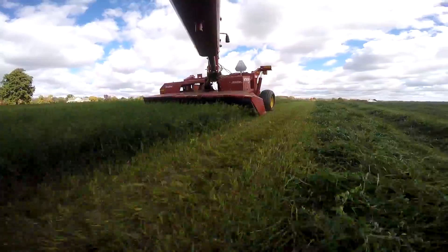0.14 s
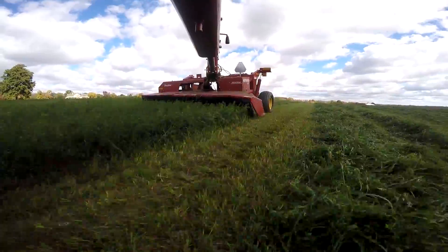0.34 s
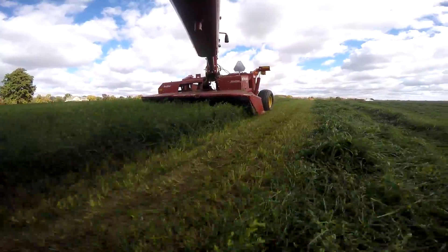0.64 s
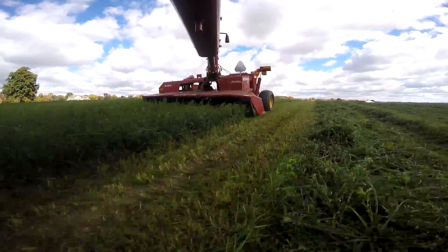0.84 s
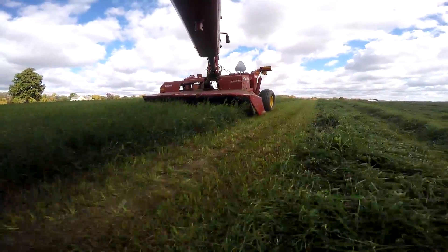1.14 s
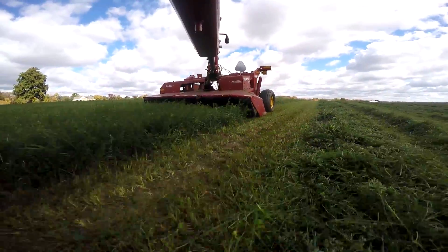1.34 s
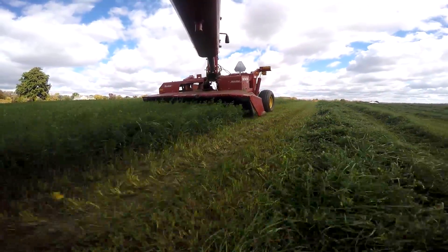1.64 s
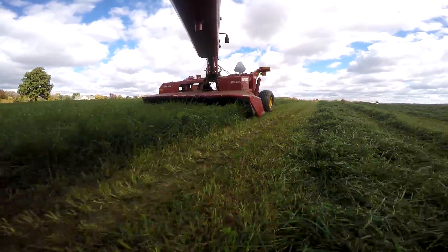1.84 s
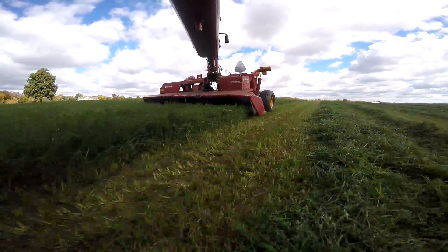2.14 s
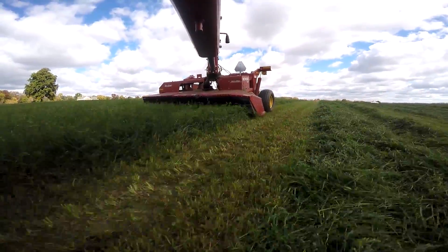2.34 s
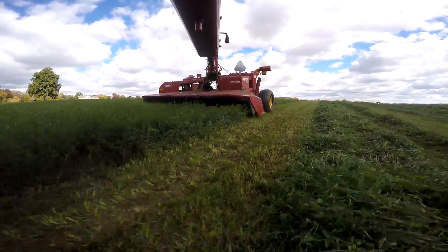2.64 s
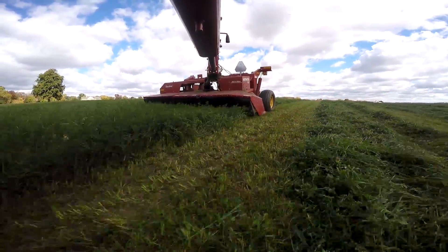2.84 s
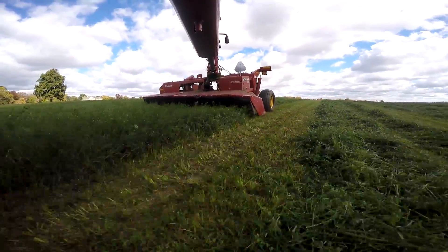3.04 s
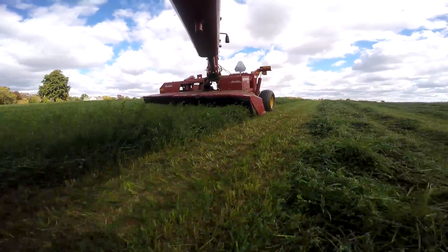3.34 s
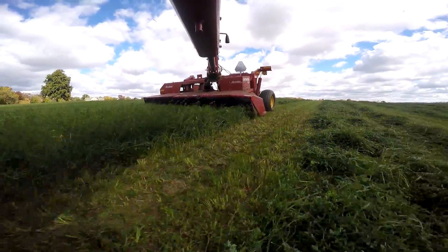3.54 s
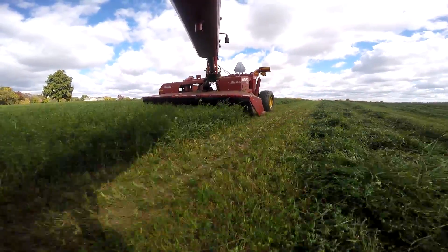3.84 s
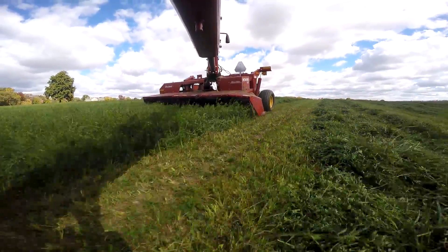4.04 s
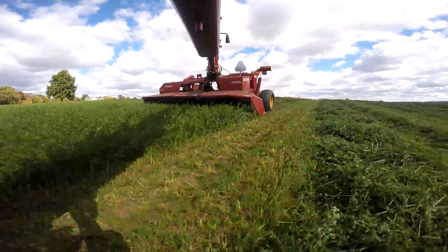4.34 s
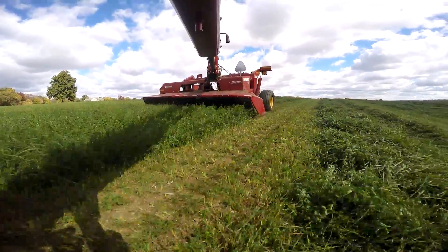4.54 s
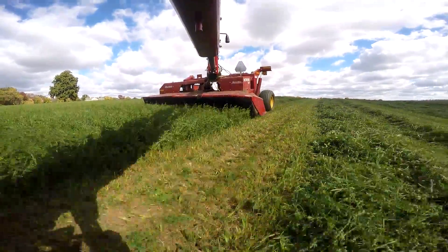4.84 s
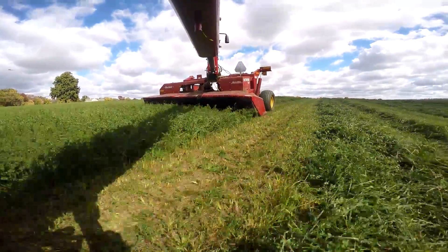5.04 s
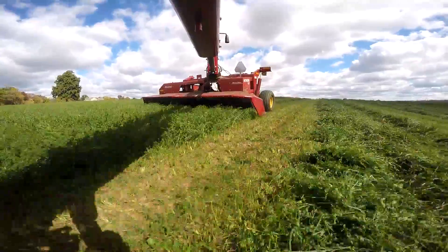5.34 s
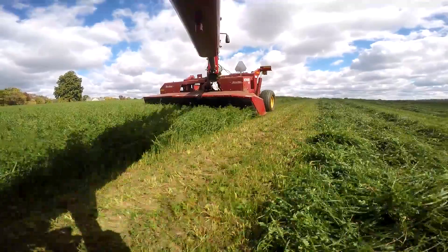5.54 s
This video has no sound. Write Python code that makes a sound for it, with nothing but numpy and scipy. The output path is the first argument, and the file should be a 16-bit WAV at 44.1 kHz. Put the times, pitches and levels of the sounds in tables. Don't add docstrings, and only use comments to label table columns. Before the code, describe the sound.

Continuous mowing machinery in an open field, picked up right on the metal frame. Irregular low thumps shudder underneath; a steady geared hum rises slightly after 1.6 seconds, sags near 4.8, then recovers. Over it, coarse gearbox rattle, ringing bar clatter and thin, fainter treble jingle swell and bunch, with scattered hard clanks throughout.

```python
import sys
import numpy as np
from scipy import signal
from scipy.fft import rfft, irfft, next_fast_len
from scipy.io import wavfile
from scipy.ndimage import uniform_filter1d, minimum_filter1d, map_coordinates

SR = 44100
rng = np.random.default_rng(int(sys.argv[2]) if len(sys.argv) > 2 else 0)


def field_ratio(decibels):
    return 10 ** (np.asarray(decibels, dtype=float) / 20)


def digitize_waveform(pressure):
    field = np.atleast_2d(pressure).T
    bounded = np.clip(field, -1, 1)
    quanta = np.round(bounded * 32767).astype(np.int16)
    wavfile.write(sys.argv[1], SR, quanta)


N = 250929
TEETH = 21


def curves(rows):
    s, *cols = np.transpose(rows)
    return [np.interp(np.arange(N) / SR, s, c) for c in cols]


def unit(x):
    return x / np.sqrt(np.mean(x ** 2) + 1e-20)


def wobble(rate):
    return map_coordinates(rng.standard_normal(int(N * rate / SR) + 4), [np.arange(N) * rate / SR])


def humps(s, half, db):
    t = np.arange(0, N + 64, 64) / SR
    bells = np.exp(-((t - s[:, None]) / half[:, None]) ** 2)
    return np.interp(np.arange(N) / SR, t, db @ bells)


def spells(rows, edge, rest_db):
    s, length, db = np.transpose(rows)
    t = np.arange(N) / SR
    since_start = t - s[:, None]
    until_end = s[:, None] + length[:, None] - t
    on = np.clip(np.minimum(since_start, until_end) / edge + .25, 0, 1)
    return rest_db + (db - rest_db) @ on


def ring(x, power):
    size = next_fast_len(N + SR // 2)
    gain = power(np.fft.rfftfreq(size, 1 / SR)) + 1e-14
    cepstrum = irfft(np.log(gain / gain.mean()) / 2, size)
    cepstrum[1:size // 2] *= 2
    cepstrum[size // 2 + 1:] = 0
    return irfft(rfft(x, size) * np.exp(rfft(cepstrum)), size)[..., :N]


def modes(table, steep):
    def power(f):
        total = 0
        for center, width, db in table:
            damping = (f * width) ** 2
            resonance = damping / ((center * center - f * f) ** 2 + damping)
            total = total + field_ratio(2 * db) * resonance ** steep
        return total
    return power


def spectrum(points):
    hz, db = np.transpose(points)
    return lambda f: field_ratio(2 * np.interp(np.log(f + 1), np.log(hz), db, left=-80, right=-80))


def shaft_turns():
    # (time [s], frequency [Hz])
    mesh_rate = [(0.0, 362.3), (0.7, 362.9), (1.55, 363.2), (1.8, 365.5), (2.2, 367.0), (2.8, 366.6),
                 (3.4, 364.9), (3.6, 365.2), (3.9, 366.7), (4.4, 366.4), (4.8, 362.2), (5.0, 362.6),
                 (5.4, 365.9), (5.7, 366.8)]
    return np.cumsum(curves(mesh_rate)[0]) / SR / TEETH


def chatter(shared, clump_db, swell_db, spiky_db):
    turns = shaft_turns()
    struck = rng.random(N) < 900 / SR
    sizes = field_ratio(spiky_db * np.minimum(rng.exponential(size=N), 3))
    taps = struck * sizes * rng.standard_normal(N)
    gate = 1 + 0.21 * np.cos(2 * np.pi * TEETH * turns)
    swell = swell_db * np.cos(2 * np.pi * (turns - .33))
    effort_db = clump_db * (shared + 0.46 * wobble(30)) + swell
    return unit(field_ratio(effort_db) * gate * (rng.standard_normal(N) + 0.58 * unit(taps)))


def knocks():
    # (time [s], peak level [dB], guard level and gearbox level relative to it [dB])
    hard_knocks = [(0.0559, -10.5, -31, -13.5), (0.8814, -4, -38, -10), (0.9366, -4, -40, -13),
                   (0.9848, -3.5, -29, 0.5), (1.4602, -5, -31.5, -6), (1.7484, -4.5, -38, -8),
                   (2.0457, -6.5, -25, -5.5), (2.091, -1.5, -36, -12), (2.4342, -11, -26.5, -14),
                   (2.4945, -1, -42.5, -12.5), (2.797, -1.5, -49, -15.5), (2.8414, -6.5, -28.5, -14),
                   (2.9108, -1, -29, -3.5), (3.0682, -14.5, -29, -12.5), (3.248, -7.5, -36, -8.5),
                   (3.4088, -0.5, -32, -13), (3.454, -7.5, -21, -12.5), (3.5964, -6, -25, -6),
                   (3.9246, -9.5, -39.5, -13.5), (3.9912, -3.5, -28, -9.5), (4.0779, -3, -31, -1.5),
                   (4.334, -3, -26, -6.5), (4.3735, -7.5, -30, -17), (4.5082, -10, -29, -10.5),
                   (4.667, -10.5, -32.5, -13), (4.7548, -3.5, -33.5, -0.5), (4.8996, -9.5, -30.5, -3.5),
                   (5.072, -13.5, -36, -15), (5.1421, 0, -30, -13), (5.4883, -4, -27, -8.5)]
    out = np.zeros((3, N + SR))
    t = np.arange(SR // 25) / SR
    envelope = field_ratio(-60 * t / 0.027) * (1 - np.exp(-t / 0.00083))
    for s, db, guard_db, box_db in hard_knocks:
        burst = envelope * rng.standard_normal((3, len(t)))
        burst[:, 8] += 3.5
        level = field_ratio(db + np.array([[-7.2], [guard_db - 8.5], [box_db - 4]]))
        start = round(s * SR)
        out[:, start:start + len(t)] += level * burst
    return out[:, :N]


def rattle():
    # (time [s], level [dB])
    crop_load = [(0.0, -1.5), (0.17, 1.06), (0.8, -0.5), (1.2, .5), (1.8, -.5), (2.3, -0.3), (2.6, -1.5),
                 (3.05, -1), (3.3, -0.5), (3.77, 2), (4.1, -1), (4.5, 1), (4.7, -2), (4.95, 2.3), (5.25, 0),
                 (5.69, -0.1)]
    # (time [s], half length [s], level [dB], extra level in the lighter steel [dB])
    surges = [(0.19, 0.027, 1, -0.5), (0.342, 0.018, 2, -2), (0.447, .03, -8.5, 3.5),
              (0.483, .015, 7, -3.5), (0.521, 0.024, -2.5, -2.5), (0.582, .025, 5, -0.8),
              (0.622, 0.024, -2.5, 0.5), (0.649, .015, 1.5, -.7), (0.787, 0.017, -1.5, -2),
              (0.866, .02, -5, 2.5), (1.158, 0.03, -4, -1.3), (1.571, 0.025, 2, -0.2),
              (1.843, 0.013, -3.5, .7), (2.514, .012, 1.5, 0), (2.542, .02, -0.5, -1.5),
              (2.636, .015, -1.5, 0), (3.056, 0.011, -3, -4), (3.099, 0.017, -0.5, -1),
              (3.133, 0.014, 2, 1.5), (3.221, 0.036, 3.5, 0), (4.045, 0.023, -2.5, -0.3),
              (4.063, .015, 6.5, -1), (4.26, .02, 2, -1.5), (4.637, .02, -3.5, 0), (4.944, 0.011, -0.5, -3),
              (5.058, 0.045, -2, -0.8), (5.147, 0.012, -0.5, 0), (5.179, .012, -4, 1),
              (5.202, 0.014, 3.5, 1), (5.343, .02, 2.5, 2)]
    # (start [s], length [s], level [dB])
    bolt_spells = [(0.173, 0.048, -63.5), (0.324, 0.042, -61), (0.448, 0.062, -59.5), (0.662, 0.13, -60),
                   (0.919, 0.046, -65), (1.258, 0.068, -60), (1.454, 0.062, -60), (1.67, 0.124, -58.5),
                   (2.034, 0.046, -63), (2.12, 0.082, -61), (2.628, 0.042, -61), (2.823, 0.058, -62),
                   (2.932, 0.036, -63), (3.014, 0.044, -61.5), (3.199, 0.18, -59.5), (3.431, 0.094, -59),
                   (3.64, 0.096, -56), (3.755, 0.068, -58), (3.906, 0.11, -60), (4.035, 0.072, -59),
                   (4.246, 0.048, -60), (4.307, 0.168, -60.5), (4.51, 0.058, -58), (4.612, 0.046, -63),
                   (4.8, 0.114, -61), (4.947, 0.112, -61), (5.101, 0.32, -60.5), (5.447, 0.042, -59),
                   (5.508, 0.048, -60), (5.656, 0.03, -57)]
    # (frequency [Hz], power density [dB per Hz])
    gearbox_colour = [(110, -26), (140, -16.5), (190, -19.5), (255, -1.5), (305, -13.5), (350, -8),
                      (385, 3), (430, -2.5), (520, -11), (740, -3.5), (835, -19.5), (1000, -9.5),
                      (1100, -6), (1350, -16), (1700, -25)]
    # (frequency [Hz], width [Hz], level [dB])
    bar_modes = [
        (1484, 120, -10.5),
        (1881, 144, -3),
        (2288, 141, 0),
        (2420, 330, -17.5),
        (2788, 28, -5),
        (3191, 130, -8.5),
        (3340, 98, -10),
        (3806, 250, -20.5),
    ]
    # (frequency [Hz], width [Hz], level [dB])
    guard_modes = [(3860, 230, -3), (4840, 300, -18.5), (5040, 200, -7), (5440, 610, -6), (5950, 100, 3),
                   (6130, 140, -10), (6340, 460, -14), (6735, 130, -8.5), (7100, 300, -17.5),
                   (7560, 250, -14.5), (7640, 99, -8), (8430, 90, -20.5)]

    shared = 0.52 * wobble(13) + 0.51 * wobble(45)
    s, half, db, extra_db = np.transpose(surges)
    load_db = curves(crop_load)[0] + humps(s, half, db)
    light_db = humps(s, half, extra_db)
    box_db = -20.5 + load_db
    bar_db = -22.5 + 0.57 * load_db + light_db
    guard_db = -43.5 + np.maximum(load_db + light_db, -1.5)
    bolt_db = spells(bolt_spells, edge=.012, rest_db=-74)

    bar_hit, guard_hit, box_hit = knocks()
    box = field_ratio(box_db + 2.01) * chatter(shared, clump_db=1.45, swell_db=1.2, spiky_db=5) + box_hit
    bar = field_ratio(bar_db + 1.67) * chatter(shared, clump_db=1.0, swell_db=1.17, spiky_db=6.5) + bar_hit
    guards = field_ratio(guard_db + 0.8) * chatter(shared, clump_db=2.0, swell_db=1.34, spiky_db=4.5) + guard_hit
    bolts = field_ratio(bolt_db) * chatter(shared, clump_db=-0.2, swell_db=0.6, spiky_db=3.0)

    heavy = lambda f: modes(bar_modes, steep=1.2)(f) / (1 + (f / 3600) ** 8)
    thin = lambda f: modes(guard_modes, steep=1.3)(f) / (1 + (3500 / (f + 1)) ** 8)
    bolt_mode = modes([(9726, 120, 0.0036)], steep=2.3)
    low = ring(box, spectrum(gearbox_colour)) + ring(bar, heavy)
    return low + ring(guards, thin) + ring(bolts, bolt_mode)


def whine():
    # (time [s], mesh tone level [dB], edge contact level [dB])
    tooth_load = [(0.0, -27.5, -40), (0.2, -16.5, -33.5), (0.55, -16, -30), (0.87, -26.5, -39),
                  (1.14, -21, -33), (1.57, -19, -31.5), (1.88, -18, -32), (2.04, -21, -28.5),
                  (2.64, -17.5, -30), (3.22, -17.5, -30), (3.41, -21.5, -42), (3.88, -18.5, -35.5),
                  (4.14, -21.5, -39), (4.52, -16.5, -45), (4.85, -14.5, -34), (5.18, -19.5, -39),
                  (5.4, -18, -38), (5.69, -20.5, -29.5)]
    # (multiple of the mesh rate [1], level relative to it [dB])
    overtones = [
        (2, -11.5),
        (3, -19),
        (8, -34),
    ]
    # (time [s], half length [s], level change [dB])
    slips = [
        (0.428, 0.058, -23.5),
        (0.72, .04, -5),
        (0.99, .03, -5),
        (1.25, 0.06, -8),
        (1.416, .04, -3),
        (1.668, .05, -8.5),
        (2.795, .06, -6.5),
        (3.092, .05, -7.5),
        (4.71, 0.083, -7.5),
        (5.043, .06, -7.5),
    ]
    phase = 2 * np.pi * TEETH * shaft_turns()

    def tone(k, db):
        level = np.sqrt(2) * field_ratio(db + 1.48 * wobble(25))
        return level * np.sin(k * (phase + 0.13 * wobble(20)))

    mesh_db, edge_db = curves(tooth_load)
    slip_db = humps(*np.transpose(slips))
    mesh_db = mesh_db + slip_db
    edge_db = edge_db + slip_db
    drift_db = 3
    fifth_db = -31.5 + 0.48 * (edge_db - edge_db.mean()) + drift_db * wobble(6.02)
    out = tone(1, mesh_db - .6)
    out = out + tone(4, edge_db + 0.6 + drift_db * wobble(5.2)) + tone(5, fifth_db)
    return out + sum(tone(int(k), mesh_db + db) for k, db in overtones)


def clamp():
    # (time [s], clamp ring level [dB], drawbar thud level [dB])
    slams = [(0.121, -9.0, -10.0), (0.396, -11.0, -16.0), (0.453, -15.0, -15.0), (0.65, -10.0, -14.0),
             (0.69, -14.0, -8.0), (0.986, -8.0, -8.0), (1.212, -9.0, -11.0), (1.455, -7.0, -11.0),
             (1.625, -9.0, -12.0), (1.802, -11.0, -10.0), (1.912, -11.0, -14.0), (2.078, -8.0, -14.0),
             (2.433, -8.0, -7.0), (2.59, -10.0, -12.0), (2.793, -13.0, -13.0), (2.882, -13.0, -14.0),
             (2.995, -10.0, -15.0), (3.125, -13.0, -12.0), (3.241, -8.0, -15.0), (3.402, -9.0, -16.0),
             (3.739, -9.0, -12.0), (3.859, -9.0, -13.0), (4.142, -9.0, -12.0), (4.37, -12.0, -12.0),
             (5.002, -13.0, -11.0), (5.122, -13.0, -9.0), (5.345, -10.0, -12.0), (5.531, -10.0, -7.0),
             (5.589, -11.0, -16.0), (5.647, -12.0, -13.0)]
    # (time [s], clamp ring level [dB])
    light_taps = [(0.054, -10.0), (0.243, -9.0), (0.572, -8.0), (0.835, -10.0), (0.927, -14.0),
                  (1.091, -10.0), (1.4, -12.0), (2.186, -14.0), (2.267, -9.0), (2.376, -10.0),
                  (2.528, -14.0), (2.703, -10.0), (3.064, -11.0), (3.177, -15.0), (3.281, -11.0),
                  (3.454, -13.0), (3.813, -14.0), (3.965, -12.0), (4.032, -13.0), (4.157, -16.0),
                  (4.309, -14.0), (4.424, -11.0), (4.5, -13.0), (4.661, -11.0), (4.841, -12.0),
                  (4.943, -10.0), (5.192, -11.0), (5.246, -13.0), (5.43, -11.0), (5.476, -12.0)]
    nudges = [.326, .505, .798, .887, 1.586, 1.774, 1.868, 1.964, 3.515, 3.574, 3.644, 3.67, 4.116, 4.275,
              4.556, 4.598, 4.75, 4.805, 5.076, 5.296]
    push, lag = .0014, .0063
    t = np.arange(SR // 2) / SR

    def bump(at):
        return np.exp(-((t[:SR // 25] - at) / push) ** 2) / (push * SR * np.sqrt(np.pi))

    stroke = bump(.006) - bump(.006 + lag)
    spring = field_ratio(-60 * t / .31) * np.sin(2 * np.pi * 82.1 * t)
    thud = -field_ratio(-60 * t / .05) * np.sin(2 * np.pi * 40 * t)

    events = list(slams)
    events += [(s, db, db - 10.5) for s, db in light_taps]
    events += [(s, -19.5, -24) for s in nudges]
    blows = np.zeros((2, N))
    for s, *db in events:
        blows[:, round(s * SR)] = field_ratio(db)
    responses = [np.convolve(spring, stroke), np.convolve(thud, stroke)]
    jolts = signal.fftconvolve(blows, responses, axes=1)[:, :N]

    after = signal.fftconvolve(blows[0], field_ratio(-60 * t / 0.097))[:N]
    shaking = unit((0.1 + after) * rng.standard_normal(N))
    shudder = ring(shaking, modes([(93, 40, -2), (54.6, 45, -2.5)], steep=1.16))
    return jolts.sum(axis=0) + field_ratio(-26.5) * shudder


def scene():
    return (clamp() + whine() + rattle())[None]


def squelch(x, floor_db, from_hz=4200, size=2048, count=8):
    hz, _, z = signal.stft(x, SR, nperseg=size)
    bands = np.abs(z[:, :-1].reshape(len(z), -1, count, z.shape[-1])) ** 2
    loud_enough = bands.max(axis=2) > field_ratio(2 * floor_db)
    heard = np.repeat(loud_enough, count, axis=1) | (hz[:-1, None] < from_hz)
    heard = np.pad(heard, ((0, 0), (0, 1), (0, 0)))
    return signal.istft(z * heard, SR, nperseg=size)[1][:, :N]


def limiter(x, top, size=SR // 200):
    need = np.minimum(1, top / (np.abs(x) + 1e-9))
    return x * uniform_filter1d(minimum_filter1d(need, 2 * size), size)


def low_pass(x):
    return signal.sosfilt(signal.butter(12, 12300, fs=SR, output="sos"), x)


def record(dry):
    dry = signal.lfilter(*signal.butter(1, 12, "high", fs=SR), dry)
    held = limiter(dry, top=.97)
    mix = squelch(held, floor_db=-71.5)
    return low_pass(mix)


dry = scene()
out = record(dry)
digitize_waveform(out)
```